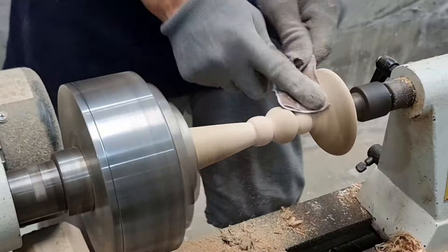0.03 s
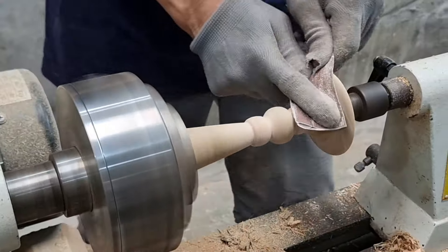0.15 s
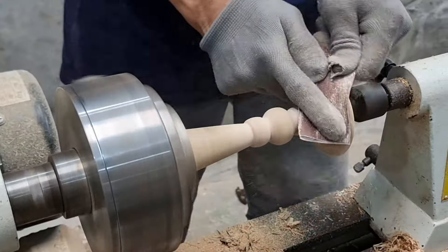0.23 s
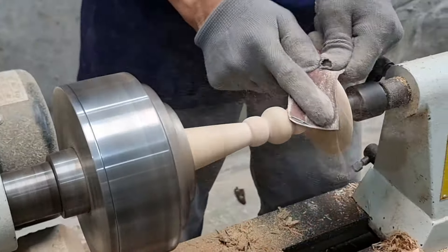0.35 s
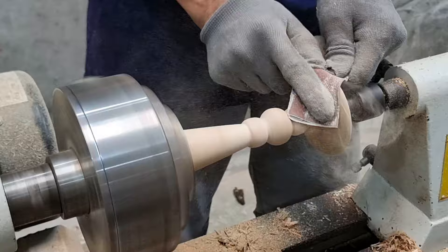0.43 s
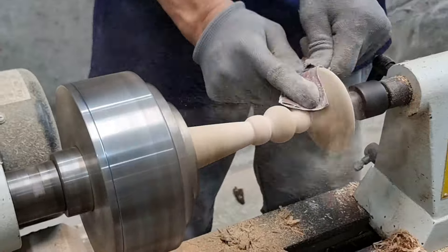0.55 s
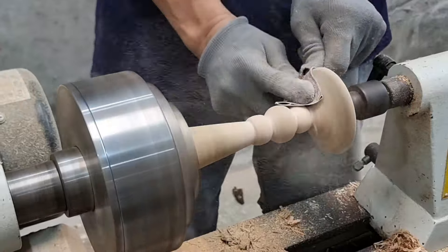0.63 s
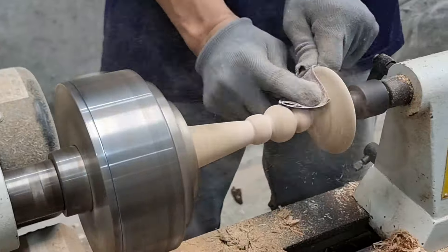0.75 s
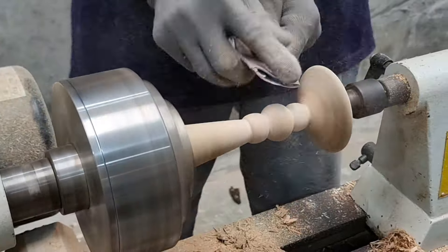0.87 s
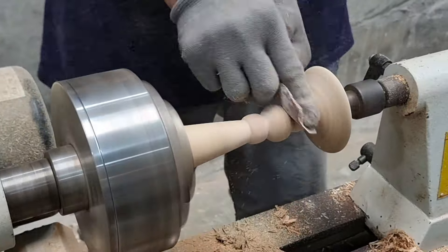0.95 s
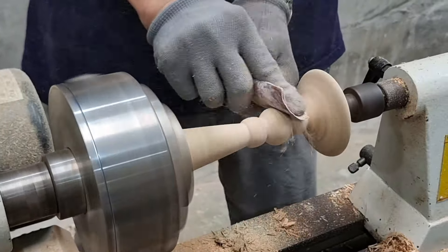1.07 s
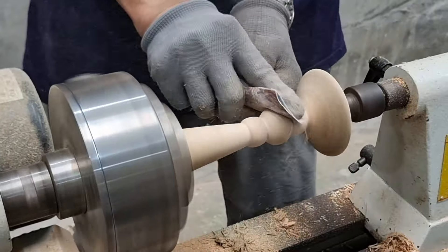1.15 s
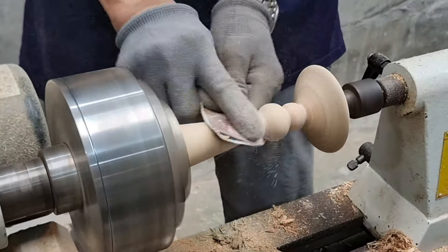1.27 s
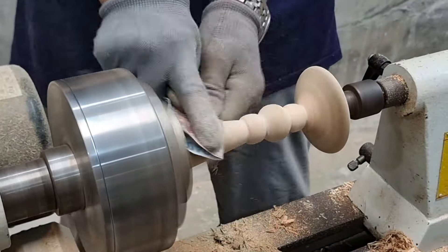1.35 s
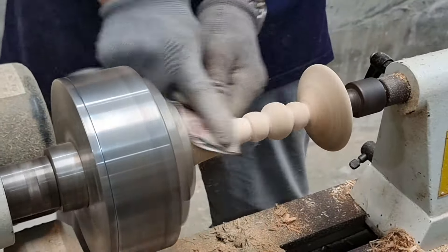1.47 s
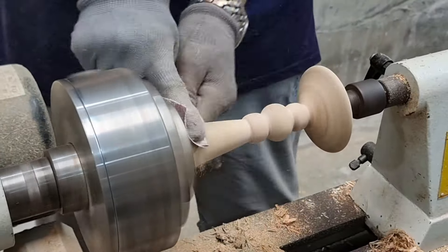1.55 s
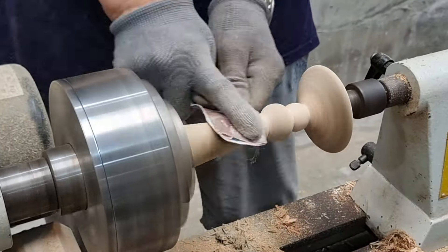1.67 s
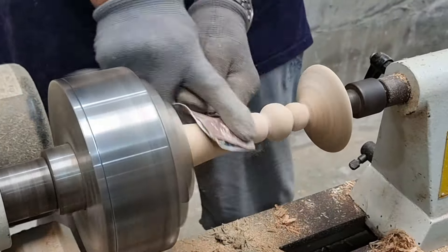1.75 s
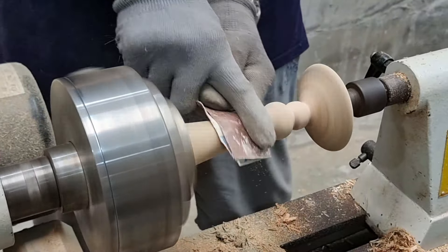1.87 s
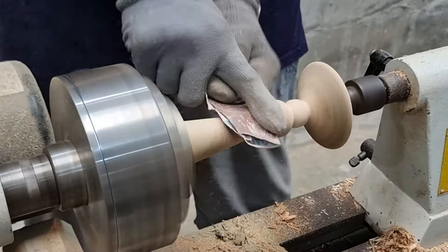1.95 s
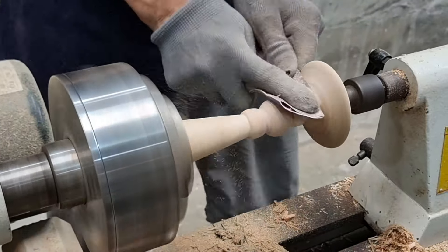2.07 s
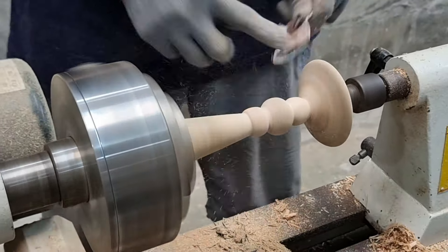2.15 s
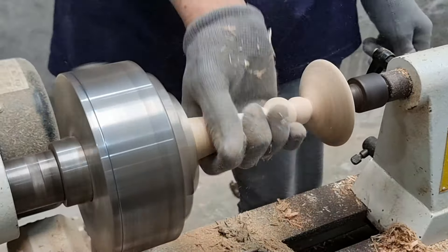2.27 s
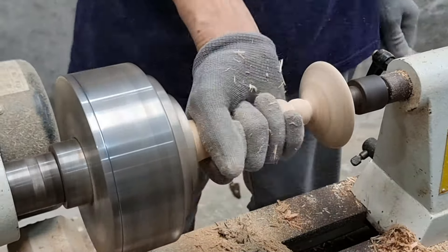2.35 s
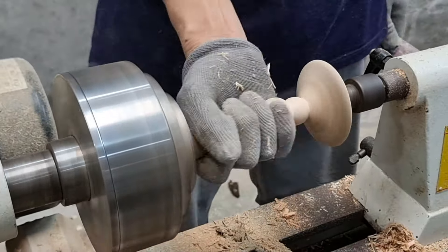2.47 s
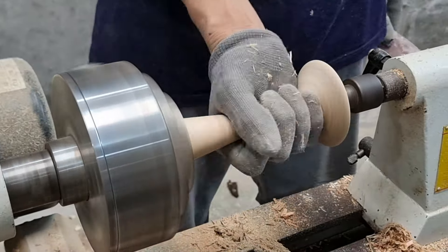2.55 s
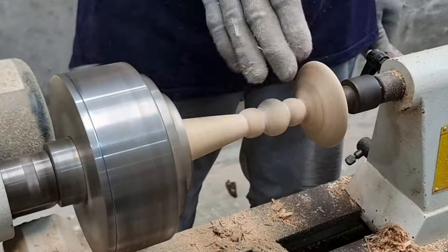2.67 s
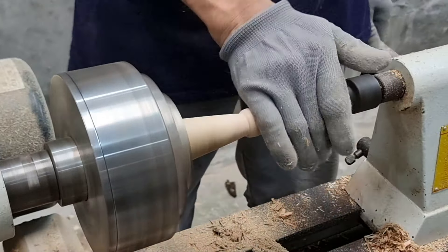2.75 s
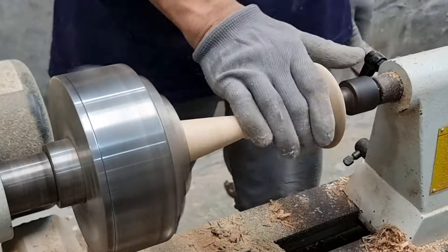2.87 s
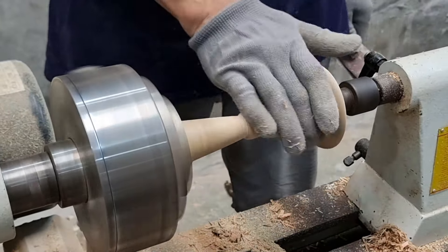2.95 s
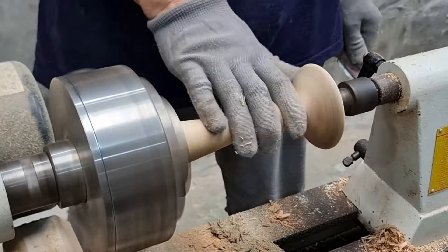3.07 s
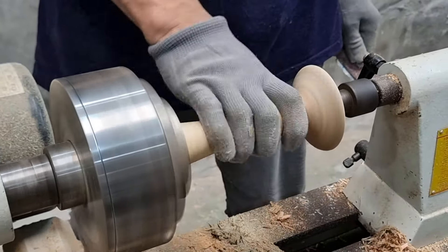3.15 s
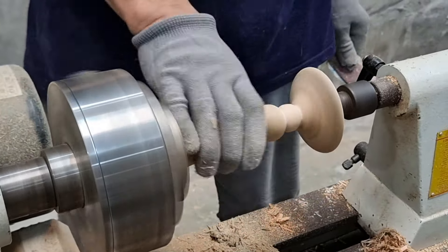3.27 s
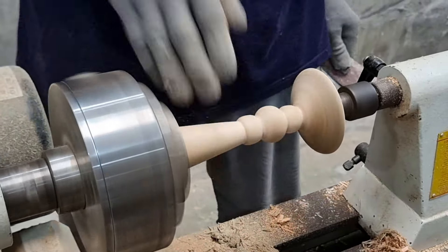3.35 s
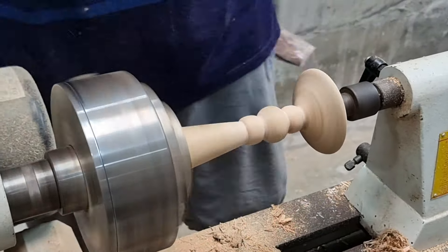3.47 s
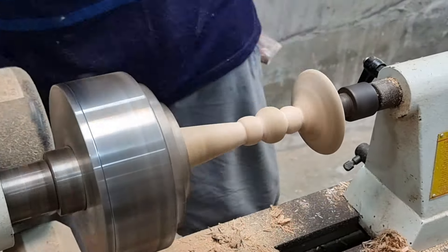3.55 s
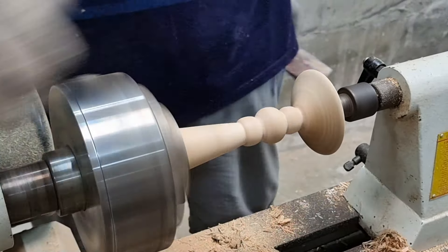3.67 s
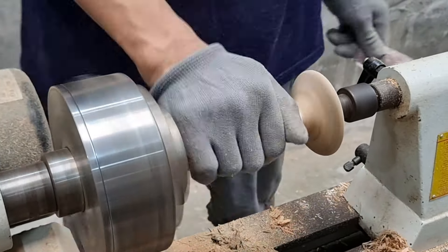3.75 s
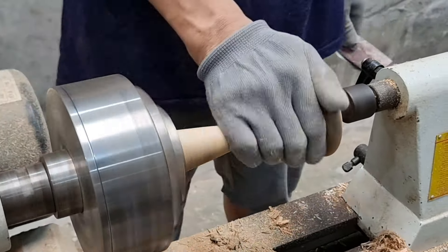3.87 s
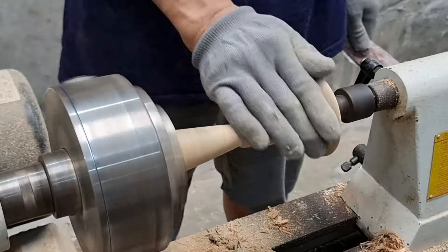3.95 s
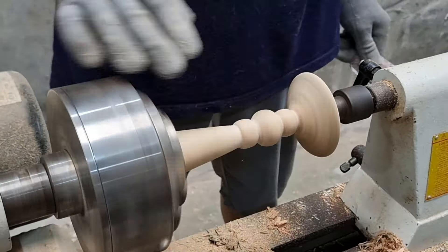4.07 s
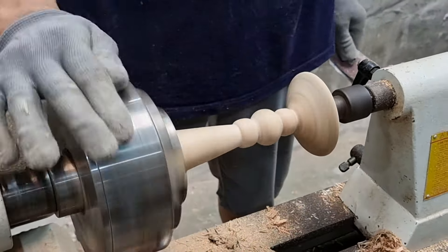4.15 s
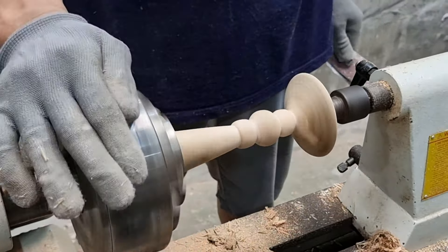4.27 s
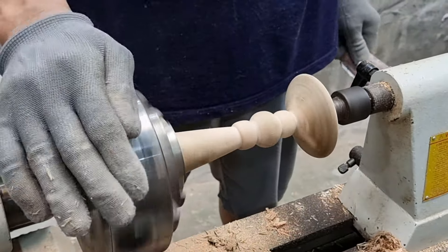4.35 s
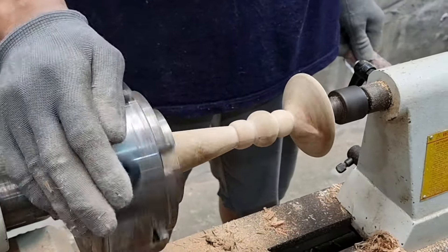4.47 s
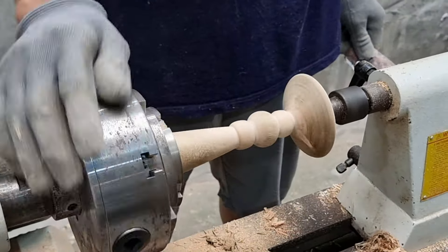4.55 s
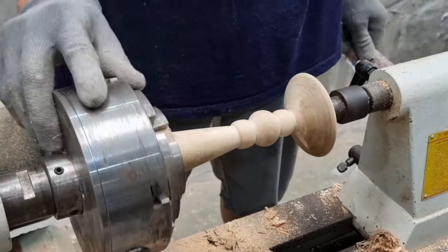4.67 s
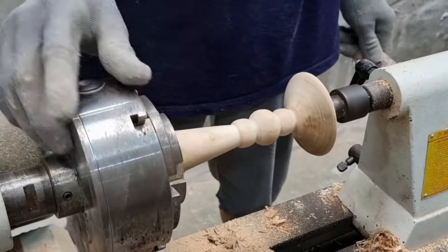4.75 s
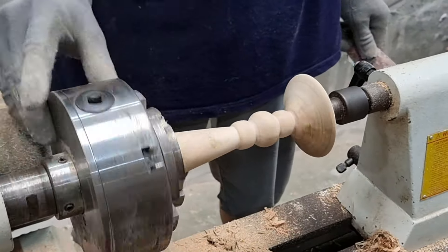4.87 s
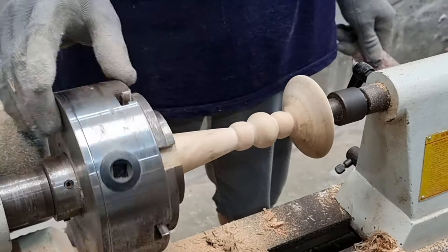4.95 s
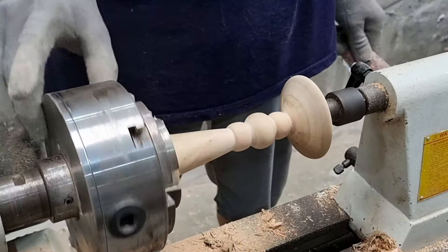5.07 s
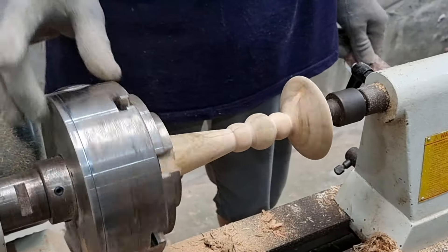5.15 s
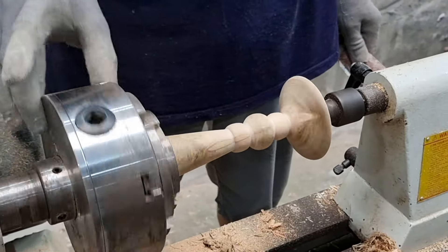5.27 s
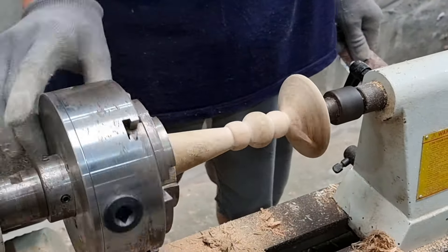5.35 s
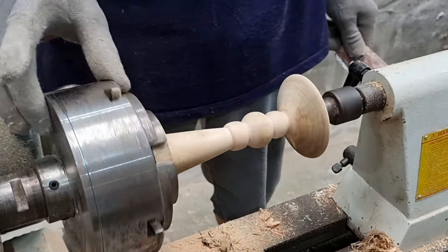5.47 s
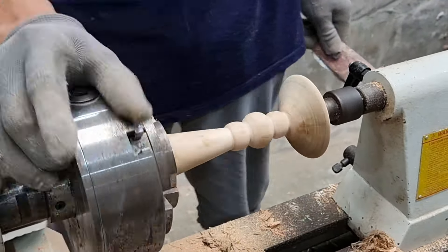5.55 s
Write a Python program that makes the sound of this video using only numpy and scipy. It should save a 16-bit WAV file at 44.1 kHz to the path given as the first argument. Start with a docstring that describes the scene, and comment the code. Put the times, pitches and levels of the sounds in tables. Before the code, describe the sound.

A small lathe hums and drones as sandpaper, then a glove, rasps on spinning wood; the motor clicks off and coasts down under a steady high whine.

```python
"""A small wood lathe runs: beating sines hum as the motor, noise rumbles and rattles as the bearings,
and one headstock resonance drones. Sandpaper, then a gloved hand, scrapes the spinning piece as shaped grit.
The motor is switched off, the spindle slows evenly to a stand and a hand brakes the chuck: clicks, slaps,
thumps, then scuffs of noise. A high electrical whine, probably from the motor drive, goes on throughout
as narrow bands of noise, over the low noise of the room."""
import sys
import numpy as np
from scipy import signal
from scipy.fft import rfft, irfft, next_fast_len
from scipy.io import wavfile
from scipy.ndimage import uniform_filter1d, map_coordinates

SR = 44100
rng = np.random.default_rng(int(sys.argv[2]) if len(sys.argv) > 2 else 0)


def transcribe(signal):
    """Save signal, clipped to [-1, 1], as a 16-bit WAV file at the path in sys.argv[1]."""
    frames = np.atleast_2d(signal).T
    limited = np.clip(frames, -1, 1)
    pcm = np.round(limited * 32767).astype(np.int16)
    wavfile.write(sys.argv[1], SR, pcm)


N = 247842
T = np.arange(N) / SR
POWER_OFF_S, STAND_S = 3.65, 4.673


def amp(db):
    """Decibels to gain."""
    return 10 ** (np.asarray(db) / 20)


def unit(x):
    """Scale so that the mid signal has rms 1."""
    return x / np.sqrt(np.mean(np.atleast_2d(x).mean(0) ** 2) + 1e-20)


def along(points, hz):
    """Interpolate (Hz, value) points on a log frequency axis."""
    f, v = np.transpose(points)
    return np.interp(np.log(hz + 1), np.log(f + 1), v)


def curves(rows):
    """One value per sample for each column after the time."""
    s, *cols = np.transpose(rows)
    return [np.interp(T, s, c) for c in cols]


def wobble(rate):
    """Smooth random curve, rate knots per second."""
    return map_coordinates(rng.standard_normal(int(N * rate / SR) + 4), [T * rate])


def pan(left_db):
    """Gains of the two channels for a left-right difference."""
    return amp([[left_db / 2], [-left_db / 2]])


def filtered(x, response):
    """Multiply the spectrum of x by a response of frequency."""
    m = next_fast_len(N + SR // 2)
    return irfft(rfft(x, m) * response(np.fft.rfftfreq(m, 1 / SR)), m)[..., :N]


def white():
    """Two unrelated white noises."""
    return rng.standard_normal((2, N))


def grit(rate, spread_db):
    """Dense tiny impacts of uneven size, rate per second, placed independently on each side."""
    hits = rng.random((2, N)) < rate / SR
    return unit(hits * white() * amp(spread_db * rng.standard_normal(N)))


# Stereo likeness. Each row: frequency in Hz, left-right correlation.
STEREO_LIKENESS = [(40, 0.46), (100, 0.66), (300, 0.54), (500, 0.26), (900, 0), (16000, 0)]


def coloured(pair, spectrum):
    """Give two noises a spectrum and the room's stereo likeness, mid rms 1."""
    ends = [(spectrum[0][0] / 2, -120), *spectrum, (spectrum[-1][0] * 2, -120)]

    def response(hz):
        turn = np.arccos(np.clip(along(STEREO_LIKENESS, hz), -1, 1)) / 2
        return amp(along(ends, hz)) * [np.cos(turn), np.sin(turn)]
    mid, side = filtered(pair, response)
    return unit(np.array([mid + side, mid - side]))


def tone(hz, lead):
    """Stereo sine of rms 1 whose left side leads by some radians."""
    phase = 2 * np.pi * np.cumsum(hz, axis=-1) / SR
    return np.sqrt(2) * np.sin(phase + np.array([[lead / 2], [-lead / 2]]))


def blow(s, attack, t60):
    """Envelope of one contact."""
    t = np.maximum(T - s, 0)
    return (1 - np.exp(-t / attack)) * 10 ** (-3 * t / t60)


def held(start, end, attack, t60):
    """Envelope that rises, holds until the end and dies away."""
    return np.clip((T - start) / attack, 0, 1) * 10 ** (-3 * np.maximum(T - end, 0) / t60)


def bump(s, half):
    """Smooth rise and fall around one moment; 1/e at the half-width."""
    return np.exp(-((T - s) / half) ** 2)


def powered(t60):
    """One while the motor is on, then dying away."""
    return held(-1.3, POWER_OFF_S, attack=1, t60=t60)


def speed():
    """Spindle speed as a share of full speed: steady, then falling evenly to a stand."""
    return np.clip((STAND_S - T) / (STAND_S - POWER_OFF_S), 0, 1)


def nearby(x, wall_db, count=10):
    """Weak early echoes off the bed, chuck and worker comb the sound differently at each side."""
    delays_s = rng.uniform(.001, .02, (2, count))
    echoes = np.zeros((2, SR // 40))
    echoes[:, 0] = 1
    echoes[[[0], [1]], (delays_s * SR).astype(int)] = amp(wall_db) * rng.standard_normal((2, count))
    return unit(signal.fftconvolve(x, echoes, axes=1)[:, :N])


def patchy(x, depth_db):
    """The contact spot shifts, so the colour changes from moment to moment."""
    z = signal.stft(x, nperseg=512)[2]
    field = uniform_filter1d(rng.standard_normal(z.shape[1:]), size=6, axis=0)
    field = uniform_filter1d(field, size=7, axis=1)
    return signal.istft(z * amp(depth_db * field / field.std()), nperseg=512)[1][:, :N]


# Room noise spectrum. Each row: frequency in Hz, relative level in dB.
ROOM_SPECTRUM = [(25, -16), (50, 2), (85, -7.5), (140, -4), (250, -15), (480, -15.5), (850, -27.5),
                 (1400, -24.5), (2150, -25.5), (2500, -27.5), (3200, -24.5), (3800, -26), (5000, -47)]


def room():
    """Steady low noise of the workshop."""
    return amp(-60.0) * coloured(white(), ROOM_SPECTRUM)


# Whine band spectra. Each row: frequency in Hz, relative level in dB.
WHINE_LOW_SPECTRUM = [(3800, -37), (4100, -15.5), (4350, -1), (4650, 2), (5030, 4), (5250, -10),
                      (5600, -24), (6000, -40)]
WHINE_HIGH_SPECTRUM = [(5400, -20), (5900, -8), (6200, -6.5), (6500, 5), (7100, 6.5), (7500, 3),
                       (7750, -14), (8000, -20)]
WHINE_TOP_SPECTRUM = [(8000, -8.5), (11000, -8.5), (12800, -2), (13800, -1), (14600, 2), (15800, -20)]


def whine():
    """Narrow bands of electrical hiss; the lowest and the highest flutter together."""
    flutter = np.sin(2 * np.pi * np.cumsum(20.3 + 0.85 * wobble(7.3)) / SR)
    low = amp(-52.0) * (1 + 0.25 * flutter) * coloured(white(), WHINE_LOW_SPECTRUM)
    high = amp(-51) * coloured(white(), WHINE_HIGH_SPECTRUM) * pan(left_db=-3.0)
    top = amp(-68.0) * (1 + 0.19 * flutter) * coloured(white(), WHINE_TOP_SPECTRUM)
    return low + high + top


# Pushes of the hand on the stopped chuck.
# Each row: centre in seconds, half-width in seconds, relative scuff level in dB, relative rumble level in dB.
CHUCK_PUSHES = [(5.268, 0.029, -53.5, -66), (5.363, 0.008, -61, -65), (5.453, 0.041, -60.5, -54.5),
                (5.588, 0.038, -56.5, -57)]
# Scuff spectrum, also for slaps and switch. Each row: frequency in Hz, relative level in dB.
SCUFF_SPECTRUM = [(300, 0), (550, -6), (800, 0.5), (1200, 2), (1750, -1), (2600, -4), (3500, -4.5),
                  (6000, -11), (10000, -34)]


def chuck():
    """The glove scuffs the steel and rolls the spindle a little by hand, with a faint low groan."""
    scuffing = sum(amp(db) * bump(s, half) for s, half, db, _ in CHUCK_PUSHES)
    rolling = sum(amp(db) * bump(s, half) for s, half, _, db in CHUCK_PUSHES)
    steel = patchy(coloured(white(), SCUFF_SPECTRUM), depth_db=0.5)
    scuff = scuffing * amp(1.5 + 1.1 * wobble(120)) * steel
    roll_spectrum = [(70, -6), (140, -6.0), (300, -3.5), (400, -6.5), (600, -8), (900, -12)]
    roll = rolling * amp(2) * coloured(white(), roll_spectrum)
    groan = amp(-57) * bump(5.51, half=0.071) * tone(np.full(N, 72), lead=0)
    return scuff + roll + groan


# Ticks of the switch, and of wood and chuck jaws against the glove.
# Each row: start in seconds, relative level in dB.
TICKS = [(2.727, -30), (3.6326, -9.5), (4.2179, -24), (4.338, -29), (4.488, -36)]
# Glove catching on the spindle and chuck jaws.
# Each row: start in seconds, relative slap level in dB, relative thump level in dB.
GLOVE_CATCHES = [(4.212, -58, -33.5), (4.336, -36, -42), (4.372, -34, -46), (4.385, -44, -43),
                 (4.441, -38, -57), (4.489, -38, -46), (4.536, -46, -51), (4.668, -70, -54),
                 (5.055, -72, -57)]
# Tick spectrum. Each row: frequency in Hz, relative level in dB.
TICK_SPECTRUM = [(500, 19), (2000, -7), (3700, 8.5), (5500, 8), (9000, -12), (15000, -9)]


def knocks():
    """Short clicks, and soft slaps and thumps of the glove on the spindle and its jaws."""
    clicks = sum(amp(db - 12.0) * blow(s, attack=.0004, t60=0.013) for s, db in TICKS)
    slaps = sum(amp(db - 9.0) * blow(s, attack=0.00053, t60=0.11) for s, db, _ in GLOVE_CATCHES)
    thumps = sum(amp(db - 6.0) * blow(s, attack=0.0023, t60=0.28) for s, _, db in GLOVE_CATCHES)
    thud = [(60, -24), (88, 2.5), (112, -18), (140, 0), (190, -6), (300, -17), (600, -11)]
    cloth = patchy(coloured(white(), SCUFF_SPECTRUM), depth_db=2.5)
    return clicks * coloured(white(), TICK_SPECTRUM) + slaps * cloth + thumps * coloured(white(), thud)


def switch(s=3.612, length=0.019, ring_hz=3550):
    """The switch scrapes, thuds and rings briefly on its way to the click that cuts the power."""
    end = s + length
    scrape = amp(-36.5) * coloured(white(), SCUFF_SPECTRUM) * held(s, end, attack=0.014, t60=0.05)
    thud_spectrum = [(90, 2), (160, 1), (400, -4), (700, -19)]
    thud = amp(-43) * coloured(white(), thud_spectrum) * held(s, end, attack=0.01, t60=0.15)
    ring = amp(-40) * tone(ring_hz + 50 * wobble(200), lead=1) * held(s, end, attack=0.005, t60=0.04)
    return scrape + thud + ring


# Momentary changes of bite, for paper and glove.
# Each row: centre in seconds, half-width in seconds, rasp gain in dB, hiss gain in dB.
CONTACT_BITES = [(0.39, 0.02, 4, -0.5), (0.95, 0.01, 4, 2.5), (1.082, 0.023, 1.5, 0.5),
                 (1.41, 0.017, -2, 0.5), (1.612, 0.0078, 7, 4.5), (1.679, 0.017, 9, 6),
                 (1.993, 0.015, 1.5, 3), (2.209, 0.012, 4, 1.5), (2.515, 0.032, 9.5, 2),
                 (2.732, 0.01, 11.5, -2), (2.858, 0.027, 4, -1), (3.105, 0.039, 5, 2.5),
                 (3.41, 0.06, 7.5, -0.5)]
# Middle and fine band spectra. Each row: frequency in Hz, relative level in dB.
SCRATCH_SPECTRUM = [(2600, -27), (3600, -3), (4300, 0), (4900, 1), (5600, -9), (7200, -8.5), (8200, -18.5),
                    (11000, -45)]
HISS_SPECTRUM = [(4000, -6), (6000, -2.5), (8000, -3.5), (10300, -4.5), (11800, 2), (14000, 2), (15800, -2)]
# the coarse rasp outlasts the fine hiss as the touch lightens
TOUCH_S, RASP_T60_S, HISS_T60_S = 0.02, 0.24, 0.09
GRIP_WAVER_DB, WALL_DB = 1.2, -16


def abrasion(touches, spectrum, rasp_db, scratch_db, hiss_db, chatter_db, patch_db):
    """Grains scrape the turning wood at each touch (start, end, rasp dB, hiss dB); contact chatters and bites."""
    coarse = sum(amp(db) * held(a, b, TOUCH_S, RASP_T60_S) for a, b, db, _ in touches)
    fine = sum(amp(db) * held(a, b, TOUCH_S, HISS_T60_S) for a, b, _, db in touches)
    coarse = coarse * amp(sum(db * bump(s, half) for s, half, db, _ in CONTACT_BITES))
    fine = fine * amp(sum(db * bump(s, half) for s, half, _, db in CONTACT_BITES))
    contact = amp(chatter_db * (wobble(33.82) + wobble(240)))
    rasp = patchy(coloured(grit(rate=9000, spread_db=0.5), spectrum), patch_db)
    rasp = rasp * coarse * amp(rasp_db + GRIP_WAVER_DB * wobble(18))
    # middle band follows both pressure and sharpness of the grit
    scratch = patchy(coloured(grit(rate=9000, spread_db=1.5), SCRATCH_SPECTRUM), patch_db)
    scratch = scratch * np.sqrt(coarse * fine) * amp(scratch_db)
    hiss = nearby(coloured(grit(rate=16000, spread_db=1.5), HISS_SPECTRUM), wall_db=WALL_DB)
    hiss = hiss * fine * amp(hiss_db)
    return contact * (rasp + scratch + hiss)


# Glove on the spinning wood, at last on the chuck.
# Each row: start in seconds, end in seconds, relative rub level in dB, relative hiss level in dB.
GLOVE_RUBS = [(2.35, 2.76, -53.5, -59), (2.81, 3.46, -53, -60), (3.85, 4.13, -55.5, -62),
              (4.21, 4.53, -71, -63)]
# Rub spectrum. Each row: frequency in Hz, relative level in dB.
RUB_SPECTRUM = [(1200, -4), (2300, 0), (3300, 2), (4300, -4.5), (5800, -2), (7500, -13), (8500, -62.5),
                (12000, -57)]


def glove():
    """The glove rubs the turning work as a softer, patchier abrasion."""
    return abrasion(GLOVE_RUBS, RUB_SPECTRUM, rasp_db=1.5, scratch_db=-9, hiss_db=1.0,
                    chatter_db=0.73, patch_db=3.5)


# Three strokes of the sandpaper, each a list of rows.
# Each row: time in seconds, relative rasp level in dB, relative hiss level in dB.
PAPER_STROKES = [
    [(-0.02, -35.5, -40.5), (0.1, -41.5, -42)],
    [(0.12, -46.5, -41.5), (0.25, -41, -33.5), (0.57, -37, -35.5), (0.69, -45.5, -40), (0.9, -40, -37),
     (0.965, -43, -41)],
    [(1.015, -42, -52), (1.09, -38, -47), (1.19, -45.5, -47.5), (1.3, -40, -43.5), (1.62, -39.5, -41),
     (1.92, -43.5, -44.5), (2.07, -38.5, -45), (2.26, -45, -45.5)],
]
# Rasp spectrum. Each row: frequency in Hz, relative level in dB.
RASP_SPECTRUM = [(1200, -26), (2200, -3.5), (2600, 2.5), (3250, 7), (3800, 3), (4600, -17), (6000, 1),
                 (9000, -34)]


def sandpaper():
    """Paper grains rasp and hiss on the turning wood as the levels follow each stroke's curve."""
    strokes = [(rows[0][0], rows[-1][0], *curves(rows)) for rows in PAPER_STROKES]
    return abrasion(strokes, RASP_SPECTRUM, rasp_db=-3.5, scratch_db=0.0, hiss_db=0.6,
                    chatter_db=0.7, patch_db=1.8)


def tailstock(db=-52, law=1.5):
    """The centre that holds the far end of the piece whirs, quieter as it slows."""
    spectrum = [(2200, -8), (3300, 0), (4200, -3), (6000, -7), (7500, -10), (8500, -30)]
    whir = coloured(grit(rate=6000, spread_db=1.0), spectrum)
    return amp(db + 1.2 * wobble(30)) * speed() ** law * whir


# Resonances that the slowing spindle passes through.
# Each row: frequency in Hz, share of full speed, width as a share of full speed, peak level in dB.
PASSED_RESONANCES = [(252, 0.793, 0.06, -38.5), (91.6, 0.49, 0.09, -50.5), (145.3, 0.27, 0.04, -49)]


def run_down():
    """Each resonance of the lathe sounds briefly as the falling speed passes it."""
    rings = 0
    for hz, at, width, db in PASSED_RESONANCES:
        nearness = 1 / (1 + ((speed() - at) / width) ** 2)
        rings = rings + amp(db) * nearness * tone(hz + 3 * wobble(15), lead=0)
    return rings * (1 - powered(t60=0.25)) * (speed() > 0)


# Brief dropouts of drone and rumble. Each row: centre in seconds, half-width in seconds, drone gain in dB.
DRONE_LULLS = [(0.06, 0.03, -12), (0.95, 0.04, -7), (1.795, 0.06, -25), (2.232, 0.012, -16),
               (2.764, 0.038, -8.5), (3.17, 0.034, -8), (3.385, 0.014, -19)]


def lull_db():
    """Gain of the drone's brief dropouts in dB."""
    return sum(db * bump(s, half) for s, half, db in DRONE_LULLS)


# Driven rumble, coasting rumble and rattle spectra. Each row: frequency in Hz, relative level in dB.
RUMBLE_SPECTRUM = [(138, -22.5), (195, -15.5), (255, -10), (297, -0.5), (345, -7), (385, -13.5), (420, -11),
                   (460, -22.5), (700, -28)]
COAST_SPECTRUM = [(60, -38), (88, -12), (115, -29), (140, -11), (200, -17), (240, -2.5), (262, 0), (300, 2),
                  (335, 1.5), (385, -16.5), (425, -6.5), (465, -23), (520, -15.5), (640, -38)]
RATTLE_SPECTRUM = [(300, -22.5), (450, -4.5), (640, -3.5), (800, -4.5), (1000, -4), (1230, -8), (1700, -5),
                   (1860, -7), (2050, -6.5), (2270, -10), (2550, -9), (3300, -12.5), (4500, -15.5)]
# Resonances of lathe bed and housing. Each row: frequency in Hz, width in Hz, relative level in dB.
BED_MODES = [(424, 16, 5), (520, 18, 8), (795, 20, 6), (930, 25, 1), (1118, 22, 6), (1378, 40, 3),
             (1608, 26, 8), (1725, 60, 7), (2080, 90, 1), (2480, 110, 2)]
# Judders of the coasting spindle. Each row: centre in seconds, half-width in seconds, gain in dB.
COAST_JUDDERS = [(3.857, 0.011, 3.5), (4.02, 0.03, 8)]
RUMBLE_DB, COAST_DB, RATTLE_DB = -33.5, -35, -42
SANDING_LOAD_DB, UNLOADED_DB = 1.54, -3  # change of rattle under the paper, and without power
LULL_RUMBLE_SHARE = 0.28  # share of the drone's dip in dB
COAST_LAW, RATTLE_LAW = 1.37, 1.2  # powers of speed


def bed_response(hz):
    """Direct sound plus the ringing modes of bed and housing."""
    modes = [amp(db - 4) * 1j * hz * w / (c * c - hz * hz + 1j * hz * w) for c, w, db in BED_MODES]
    return 1 + sum(modes)


def bearings():
    """Rolling contacts shake the headstock and ring the bed; rumble and rattle sink with the speed."""
    load = powered(t60=0.21)
    sanding = held(-1, PAPER_STROKES[-1][-1][0], attack=1, t60=0.44)
    driven_db = RUMBLE_DB + LULL_RUMBLE_SHARE * lull_db() + 1.24 * wobble(40)
    driven = coloured(white(), RUMBLE_SPECTRUM) * amp(driven_db) * load
    judder_db = sum(db * bump(s, half) for s, half, db in COAST_JUDDERS)
    coast_db = COAST_DB + judder_db + 1.0 * wobble(25)
    coast = coloured(white(), COAST_SPECTRUM) * amp(coast_db) * (1 - load) * speed() ** COAST_LAW
    contacts = coloured(grit(rate=9000, spread_db=0.0), RATTLE_SPECTRUM)
    rattle_db = RATTLE_DB + SANDING_LOAD_DB * sanding + UNLOADED_DB * (1 - load)
    rattle_db = rattle_db + 0.78 * wobble(16) + 0.96 * wobble(160)
    rattle = unit(filtered(contacts, bed_response)) * amp(rattle_db) * speed() ** RATTLE_LAW
    return driven + coast + rattle


# Swells of the drone. Each row: start in seconds, end in seconds, relative level in dB.
DRONE_SWELLS = [(-0.02, 0.018, -25), (0.18, 0.32, -24.5), (0.457, 0.564, -26), (0.568, 0.83, -22.5),
                (1.08, 1.218, -22), (1.495, 1.7, -24.5), (1.953, 2.2, -24), (2.491, 2.585, -22.5),
                (2.947, 3.077, -24.5), (3.495, 3.574, -24.5)]
DRONE_HZ, SWELL_RISE_S, SWELL_T60_S = 297.5, 0.024, 0.74
DRONE_REST_REL_DB = -29.5  # on the scale of the swells


def headstock():
    """The spinning load keeps one resonance droning; it swells fast, ebbs slowly and shudders."""
    swells = np.max([amp(db) * held(a, b, SWELL_RISE_S, SWELL_T60_S) for a, b, db in DRONE_SWELLS], axis=0)
    rest = amp(DRONE_REST_REL_DB + 1.4 * wobble(18))
    shudder = amp(1.5 * wobble(20) + 0.93 * wobble(130))
    level = amp(lull_db() - 2.0) * np.maximum(swells, rest) * shudder * powered(t60=0.12)
    hz = DRONE_HZ + 1 * wobble(7.75) + 2.0 * wobble(60)
    return level * tone(hz, lead=0.42) * pan(left_db=-1.5)


# Frame tremble spectrum. Each row: frequency in Hz, relative level in dB.
FRAME_SPECTRUM = [(25, -16), (44, -4), (56, -4), (72, 4), (110, 3), (140, -11), (200, -10)]
HUM_HZ, HUM_DB, SAG_HZ_PER_S, HUM_T60_S = 99.9, -42, 110, 0.24


def motor():
    """The hum beats against a weaker shaft tone and sags when the power is cut; the frame trembles with it."""
    hz = HUM_HZ + 2.0 * wobble(9) - SAG_HZ_PER_S * np.clip(T - POWER_OFF_S, 0, .5)
    hum = amp(HUM_DB + 0.74 * wobble(24.67)) * tone(hz, lead=-0.22) * pan(left_db=-2)
    beat = amp(HUM_DB - 15 + 2.6 * wobble(6.9)) * tone(.93 * hz + 4 * wobble(14), lead=-0.33)
    unbalance = amp(HUM_DB - 24 + 2.5 * wobble(4.5)) * tone(0.35 * hz + 1.2 * wobble(7.2), lead=0)
    tremble = amp(-50.0) * coloured(white(), FRAME_SPECTRUM)
    return (hum + beat + unbalance) * powered(HUM_T60_S) + tremble * powered(t60=1.2)


def scene():
    """The workshop's low background, the hands and the lathe."""
    background = room() + whine()
    hands = chuck() + knocks() + switch() + glove() + sandpaper()
    lathe = tailstock() + run_down() + bearings() + headstock() + motor()
    return background + hands + lathe


# Colour of the two microphone ports. Each row: frequency in Hz, left-right difference in dB.
PORT_COLOUR = [(100, -0.5), (400, 0), (1000, 0), (1700, -0.8), (2700, 1.5), (4300, -3.5), (5600, -2),
               (7400, 2), (8200, 1), (9200, -1), (11000, 3), (12600, -6.5), (14000, -8.5), (15800, 8)]
TOP_HZ = 15850


def record(dry):
    """Each microphone port adds its own colour; nothing passes above the band limit."""
    return filtered(dry, lambda hz: amp(along(PORT_COLOUR, hz) * [[.5], [-.5]]) * (hz < TOP_HZ))


dry = scene()
out = record(dry)
transcribe(out)
```